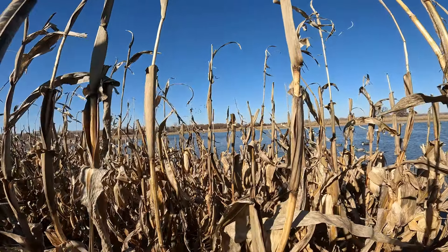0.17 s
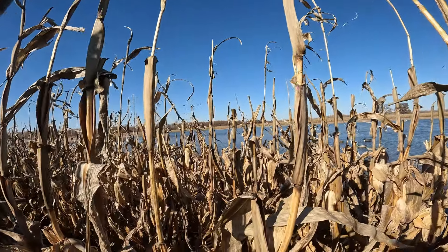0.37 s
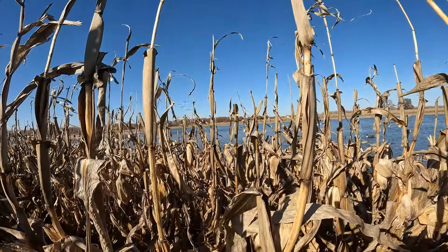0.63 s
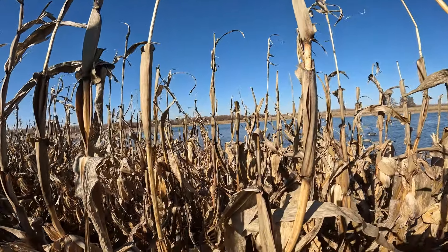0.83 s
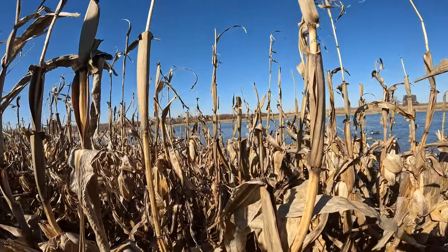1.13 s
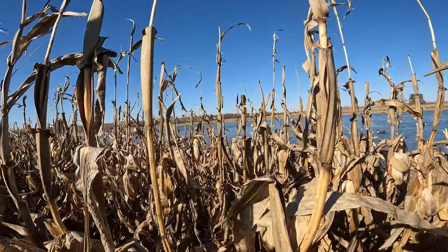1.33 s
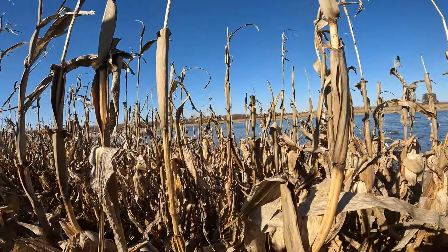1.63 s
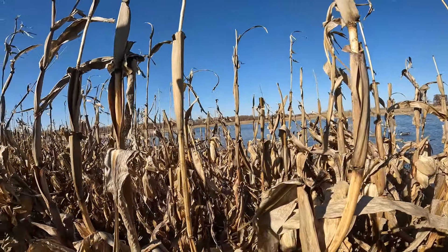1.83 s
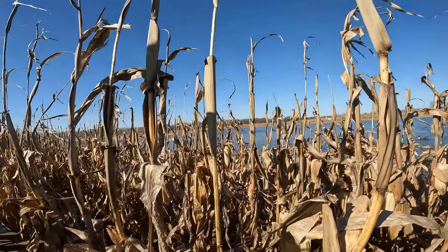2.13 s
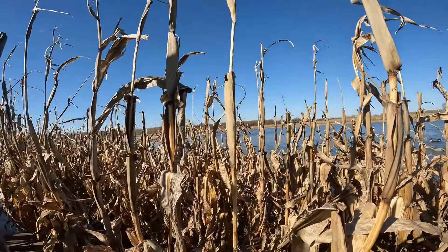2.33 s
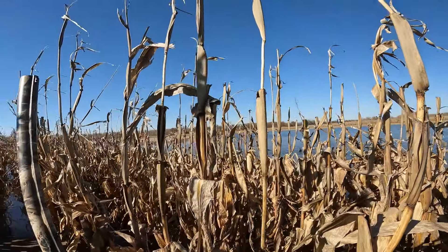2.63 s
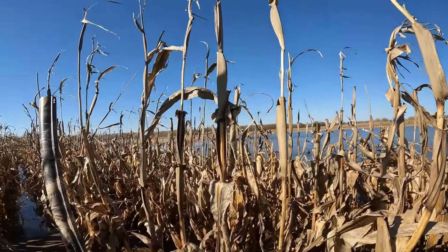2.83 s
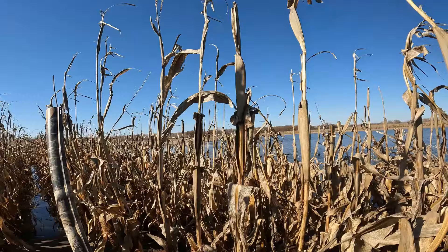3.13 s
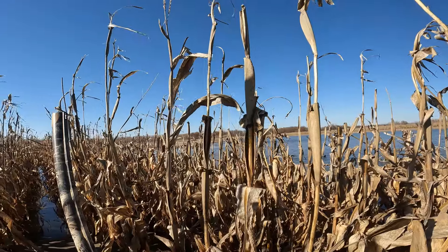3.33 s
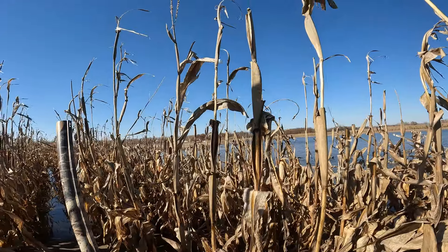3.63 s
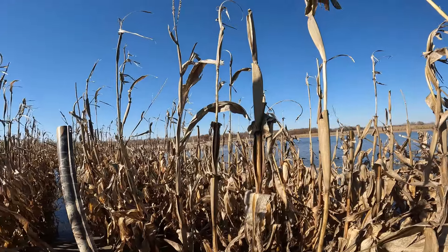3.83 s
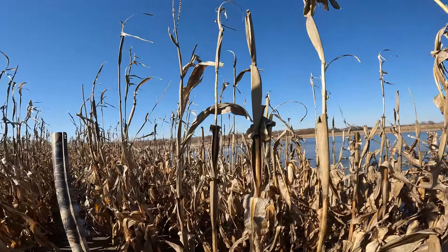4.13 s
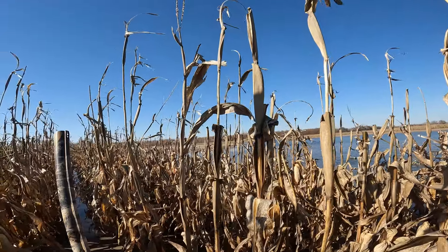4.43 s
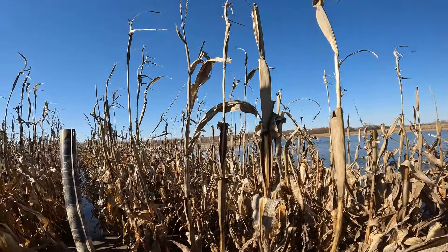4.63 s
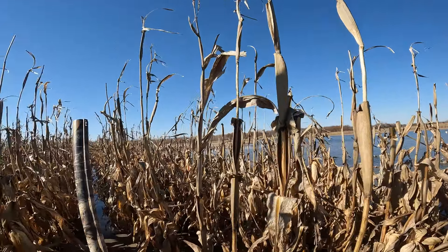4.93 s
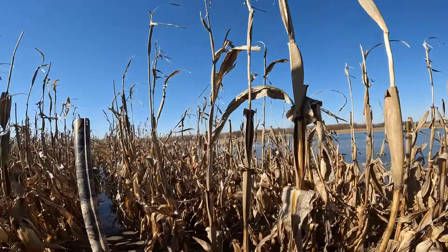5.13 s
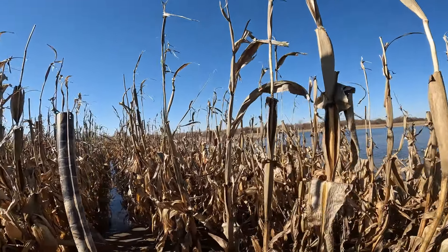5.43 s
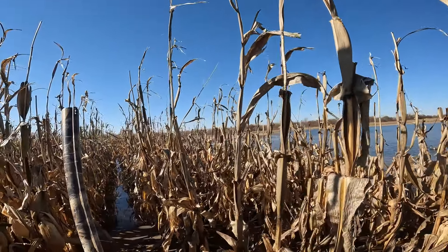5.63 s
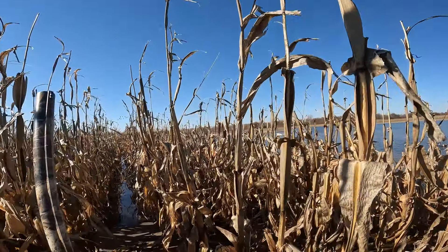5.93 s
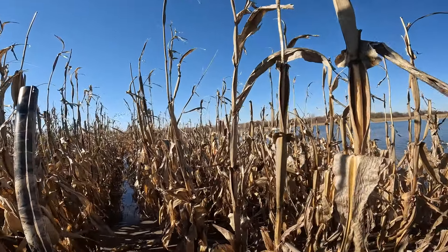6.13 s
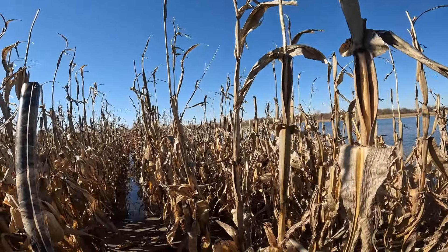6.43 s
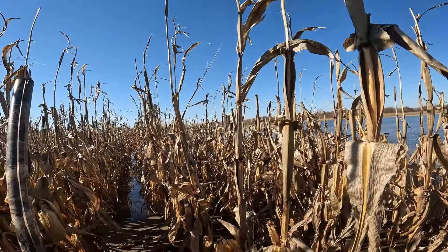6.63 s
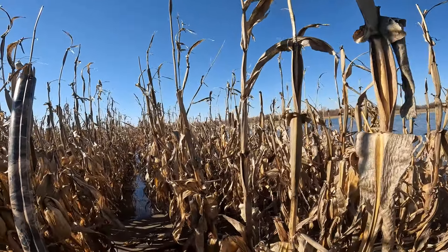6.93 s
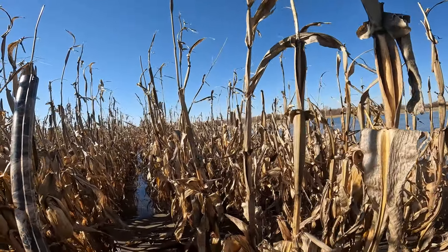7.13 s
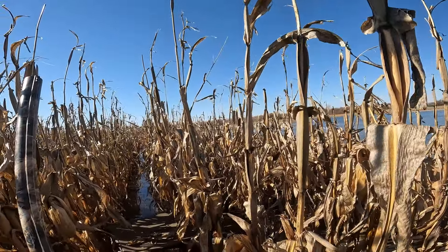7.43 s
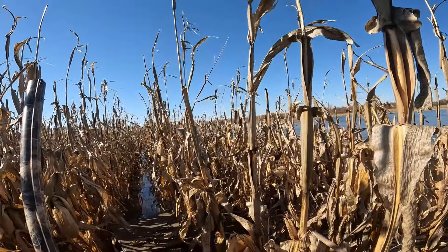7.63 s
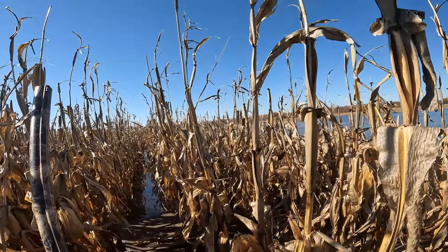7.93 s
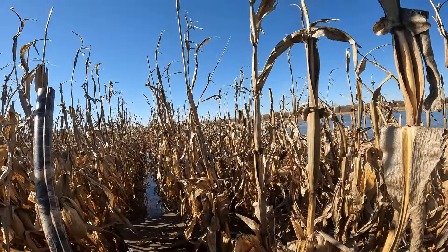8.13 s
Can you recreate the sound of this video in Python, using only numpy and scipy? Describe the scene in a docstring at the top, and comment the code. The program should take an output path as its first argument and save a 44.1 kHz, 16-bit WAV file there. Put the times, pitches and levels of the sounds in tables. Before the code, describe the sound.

A nearby duck call gives a drawn-out reedy note followed by seven fast, rough quacks, most starting with a brief low hum. A second call replies from farther off, its quieter quacks gradually slowing. Wind rumbles and thumps on the microphone while dry corn stalks tick lightly, and the close call sounds the same pattern again. The setting is an open flooded field with a soft background hiss.

```python
"""Low wind on the microphone ports, background hiss and ticking dry stalks, in a flooded corn field.
A near duck call blows a long note and a run of raspy quacks; a far call answers; the near one repeats.
Each call is a reed slapping into a resonant barrel, with air rushing past. A low sliding hum starts
most near quacks. Gusts buffet the ports; the open field returns a short dull echo."""
import sys
import numpy as np
from scipy import signal
from scipy.fft import rfft, irfft, next_fast_len
from scipy.io import wavfile
from scipy.ndimage import uniform_filter1d

SR = 44100
rng = np.random.default_rng(int(sys.argv[2]) if len(sys.argv) > 2 else 0)


def master_out(mix):
    """Clip the mix to full scale and print it as 16-bit PCM to the path in sys.argv[1]."""
    frames = np.transpose(np.atleast_2d(mix))
    ceiling = np.clip(frames, -1, 1)
    pcm = np.round(ceiling * 32767).astype(np.int16)
    wavfile.write(sys.argv[1], SR, pcm)


N = 364953

# wind rumble on the ports: (time [s], level [dB])
WIND_LEVEL = [(0, -39.5), (.25, -48.5), (.6, -46), (1.1, -50.5), (1.4, -56.5), (1.8, -49), (2.0, -60.5),
              (3.5, -54.5), (3.9, -50), (4.5, -46), (5.0, -38), (5.7, -32.5), (6.15, -56), (6.4, -31.5),
              (6.7, -48.5), (7.1, -32), (7.45, -31), (7.75, -46), (8.28, -46)]
# rumble spectrum: (frequency [Hz], density [dB])
WIND_SPECTRUM = [(12, -34), (26, 3), (40, -4), (60, -6), (110, -11), (200, -23.5), (350, -29.5), (700, -53),
                 (1500, -100)]
# gusts over the rumble: (centre [s], peak [dB], length [s])
WIND_GUSTS = [(0.38, -26.5, 0.21), (0.948, -61.5, 0.19), (1.857, -46, 0.059), (2.734, -53, 0.12),
              (4.23, -37, 0.088), (4.398, -31.5, 0.064), (4.637, -35.5, 0.17), (4.866, -28, 0.31),
              (5.125, -22.5, 0.011), (5.531, -31.5, 0.12), (5.815, -23, 0.052), (5.956, -32.5, 0.37),
              (6.25, -42, 0.053), (7.14, -47, 0.096), (7.51, -27, 0.053), (7.622, -25.5, 0.13),
              (7.925, -43, 0.1), (8.243, -40.5, 0.15)]
# sharp pressure swings: (centre [s], peak [dB], frequency [Hz], 1/e half-width [s])
WIND_BUFFETS = [(4.76, -21, 40, .012), (4.794, -11.5, 110, 0.0032), (4.815, -15.5, 115, .007),
                (4.833, -15, 197, 0.0065), (4.847, -9.5, 228, 0.002), (4.856, -11, 70, 0.0048),
                (4.873, -10.5, 89.5, 0.0068), (4.896, -6, 220, 0.0016), (4.91, -9.5, 122, 0.0045),
                (4.923, -20, 130, 0.011), (4.944, -11, 129, 0.0057), (5.461, -10, 224, 0.0028),
                (5.552, -24.5, 99, 0.0071), (5.619, -26.5, 153, 0.003), (5.676, -22, 139, 0.0028),
                (5.803, -11.5, 128, 0.0032), (7.003, -27, 198.2, 0.0037), (7.194, -32, 90.2, .01),
                (7.613, -24, 150, 0.0053), (7.631, -23.5, 294.7, 0.0048), (7.654, -22, 110, 0.0068),
                (7.666, -22, 170, 0.002), (7.908, -28.5, 129, 0.01), (7.964, -33, 136, 0.005)]
# background hiss: (time [s], level [dB])
HISS_LEVEL = [(0, -49), (.33, -51.5), (.66, -62.5), (1.73, -61), (2.05, -66), (2.3, -61.5), (3.7, -51.5),
              (5.0, -51.5), (5.6, -47.5), (5.9, -50), (6.25, -63), (6.7, -57), (7.43, -61.5), (7.8, -64),
              (7.95, -57.5), (8.06, -60.5), (8.28, -58.5)]
# hiss spectrum: (frequency [Hz], density [dB])
HISS_SPECTRUM = [(100, -48), (300, -6.5), (700, -12.5), (1300, -6), (2400, -12), (5700, -14.5), (7500, -20),
                 (10600, -26), (15500, -35)]
# stalk ticks: (time [s], peak [dB], frequency [Hz], t60 [s])
STALK_TICKS = [(0.049, -43, 2270, 0.075), (0.088, -52, 1980, 0.038), (0.279, -36, 1760, 0.016),
               (0.307, -36, 6900, .02), (2.445, -41, 4280, 0.016), (4.796, -38, 2660, 0.015),
               (5.09, -35, 4100, 0.11), (5.1094, -34, 5400, 0.019), (5.109, -42, 1450, 0.042),
               (5.204, -49, 8000, 0.01), (5.319, -44, 1215, 0.05), (5.349, -41.5, 4570, 0.12),
               (5.405, -31.5, 1270, 0.13), (5.431, -28.5, 1140, 0.047), (5.442, -38, 1030, 0.041),
               (5.509, -37, 1680, 0.039), (5.468, -43, 3720, .015), (5.5077, -33, 4830, .02),
               (5.51, -46, 10000, .015), (5.696, -35, 4020, 0.024), (5.697, -48, 10000, .012),
               (5.76, -38, 5560, .03), (5.772, -48, 10600, 0.011), (5.873, -42, 4360, 0.013),
               (7.879, -43.5, 744, 0.035), (8.025, -46.5, 1160, 0.053), (8.03, -45, 5000, .012)]
# hums as the air starts: (start [s], peak [dB], first pitch [Hz], length [s])
ONSET_HUMS = [(0.352, -10.5, 278.7, .072), (0.762, -22.5, 294.7, 0.075), (0.943, -21, 199, 0.059),
              (1.11, -30.5, 177, 0.062), (1.257, -21, 233, 0.052), (1.424, -25, 220, .073),
              (1.596, -22, 222, .055), (1.757, -20.5, 215, 0.064), (2.118, -39, 168, .035),
              (5.904, -15, 261, .072), (6.369, -21.5, 277.4, 0.062), (6.546, -25.5, 176.3, 0.035),
              (6.702, -26, 210.4, 0.091), (6.862, -26, 214, .054), (7.035, -21.5, 229.6, .07),
              (7.233, -23.5, 237, 0.054), (7.456, -22, 252.6, 0.06)]
# long note opening each near run: (time [s], beat rate [Hz], level [dB], raggedness [0-1], pairing [0-1])
NEAR_LONG_NOTES = [
    [(.377, 255, -15, .25, 0), (.392, 290, -16, .5, 0), (.41, 440, -16, .55, .5), (.428, 525, -16, .15, 0),
     (.462, 597, -14, .08, 0), (.49, 582, -15, .13, 0), (.505, 580, -15, .06, 0), (.55, 572, -15, .07, 0),
     (.578, 537, -16, .12, 0), (.6, 520, -16, .2, 0), (.612, 490, -18, .7, .1), (.622, 480, -28, .6, .1)],
    [(5.931, 255, -14, .3, 0), (5.948, 300, -15.5, .5, 0), (5.968, 420, -16, .4, .3),
     (5.978, 495, -16.5, .14, 1), (6.025, 530, -15.5, .06, 1), (6.05, 526, -15.5, .22, 1),
     (6.07, 520, -16, .08, 1), (6.11, 505, -16.5, .1, 1), (6.15, 493, -17.5, .14, 1),
     (6.185, 520, -17, .15, .9), (6.203, 500, -18, .6, .3), (6.213, 480, -25, .6, 0)],
]
# near barrel and cupped hand, one grip per run: (frequency [Hz], gain [dB])
NEAR_BARREL_GAINS = [
    [(600, -17.5), (760, -22), (900, -9), (1050, -4), (1450, -4.5), (1650, -4), (1850, 4.5), (2100, -2.5),
     (2550, -9), (3050, -26.5), (3500, -27), (4100, -23.5), (4700, -23.5), (5900, -19), (7000, -28.5),
     (10000, -44.5), (15000, -62.5)],
    [(600, -17.5), (760, -23), (900, -12.5), (1050, -6), (1450, -6), (1650, -3.5), (1850, 1.5),
     (2100, -7.5), (2600, -9.5), (3050, -21), (3500, -32.5), (4100, -23.5), (4700, -33), (5900, -23.5),
     (7000, -33.5), (10000, -46.5), (15000, -68.5)],
]
# level of the calls between the ports: (frequency [Hz], left over right [dB])
PORT_BALANCE = [(60, -1.5), (130, 0.0), (290, 0.5), (640, 2.0), (1410, 2.5), (3100, 1.5), (6820, 1.0),
                (15000, 1.5)]
# phase of the calls between the ports: (frequency [Hz], left lead [rad])
PORT_PHASE = [(100, 0), (600, -.05), (1100, -.15), (1900, -.6), (2600, -.5), (3900, -.3), (6000, 0),
              (15000, 0)]
# short near quacks: (start [s], length [s], level [dB], at speed after [s], first rate [Hz],
# slow rate [Hz], full rate [Hz], raggedness at speed [0-1], pairing [0-1])
NEAR_SHORT_QUACKS = [ (0.793, 0.07, -16.5, 0.036, 327.6, 293.2, 543, 0.11, 0.09),
                     (0.931, 0.093, -17, 0.071, 297.6, 288.1, 550, 0.37, 0.27),
                     (1.087, .097, -17, 0.091, 497.7, 346.5, 513, 0.09, 0.18),
                     (1.251, 0.104, -17.5, 0.066, 398.3, 269.3, 514.3, 0.5, 0.28),
                     (1.418, .1, -18, 0.08, 317.9, 282.2, 515.8, .2, 0.11),
                     (1.590, 0.093, -18, 0.072, 305, 267.5, 516.2, 0.26, 0.17),
                     (1.757, .120, -17, 0.069, 290, 267, 474.4, 0.062, 0.086),
                     (6.393, 0.084, -17, 0.032, 327.9, 314, 532, 0.44, 0.14),
                     (6.543, 0.093, -16.5, 0.036, 392.8, 351, 510.3, 0.45, 0.17),
                     (6.702, .079, -17.5, .050, 334, 294.3, 521, 0.68, 0.52),
                     (6.858, 0.1, -17, 0.066, 482.3, 339, 504.2, 0.37, 0.28),
                     (7.047, 0.089, -18, 0.055, 328.7, 308.5, 502, 1, 0.041),
                     (7.240, 0.092, -18, 0.051, 300.6, 283.7, 502.6, 0.76, 0.41),
                     (7.479, 0.084, -17, 0.048, 316.5, 297, 498.8, 0.6, 0.44)]
# soft falling first far note: (time [s], beat rate [Hz], level [dB], raggedness [0-1], pairing [0-1])
FAR_FIRST_NOTE = [(1.883, 600, -32, .3, 0), (1.91, 592, -33, .18, 0), (1.925, 575, -29, .07, 0),
                  (1.95, 540, -25.5, .07, .1), (1.96, 525, -27, .2, .8), (1.977, 520, -30, .35, .8),
                  (1.986, 490, -42, .6, .3)]
# far barrel: (frequency [Hz], gain [dB])
FAR_BARREL_GAIN = [(330, -20), (520, -12), (850, -15), (1000, -8), (1400, -6), (1750, -3.5), (2250, -6),
                   (2550, -4), (2750, -1), (3000, -7), (3400, -17), (4000, -14), (5100, -22.5), (5700, -22),
                   (6200, -21.5), (7300, -38), (11000, -51.5), (11900, -50), (12800, -58.5), (15000, -63)]
# short far quacks: (start [s], length [s], peak [dB], loudest after [s], at speed after [s],
# first rate [Hz], full rate [Hz], final rate sag [share], pairing [0-1])
FAR_SHORT_QUACKS = [ (2.116, 0.076, -23.5, 0.027, .02, 449.2, 533, 0.098, 1),
                    (2.304, 0.065, -22, 0.029, 0.027, 374, 535, 0.043, 0.95),
                    (2.471, 0.072, -21.5, 0.038, 0.036, 325, 520, 0.065, 0.63),
                    (2.64, 0.077, -20, 0.048, 0.039, 316, 530.4, 0.082, 0.8),
                    (2.815, 0.073, -19.5, 0.056, 0.043, 314.5, 500.3, 0.027, 0.47),
                    (2.984, 0.085, -19.5, .05, 0.042, 317.4, 500, 0.071, 0.56),
                    (3.187, 0.069, -19.5, .044, .038, 310.5, 494, .06, 1),
                    (3.372, 0.066, -19.5, 0.044, 0.035, 297, 486, 0.056, 0.83),
                    (3.57, .075, -20, 0.033, .034, 299, 493, 0.052, .1),
                    (3.765, 0.069, -20, .039, 0.033, 302, 479, 0.094, 0.53),
                    (3.973, 0.06, -19.5, 0.033, 0.033, 311.7, 475.4, 0.069, 0.7),
                    (4.187, 0.064, -19.5, .031, 0.032, 330.7, 472.4, 0.11, 0.72),
                    (4.404, 0.06, -19.5, 0.026, 0.031, 299.7, 472.8, 0.098, 0.58)]


def from_db(db):
    """Decibels to gain."""
    return 10 ** (np.asarray(db) / 20)


def rms_one(x):
    """Scale to rms 1."""
    return x / np.sqrt(np.mean(x ** 2) + 1e-20)


def in_time(rows):
    """Curve columns, one value per sample."""
    times_s, *columns = np.transpose(rows)
    return [np.interp(np.arange(N) / SR, times_s, column) for column in columns]


def at_hz(points, hz):
    """Read a spectrum on a log axis."""
    knots_hz, values = np.transpose(points)
    return np.interp(np.log(hz + 1), np.log(knots_hz), values)


def shape(x, response):
    """Filter by a function of Hz."""
    size = 2 * next_fast_len(N // 2 + 1)
    return irfft(rfft(x, size) * response(np.arange(size // 2 + 1) * SR / size), size)[..., :N]


def drift(rate_hz):
    """Slow random signal, rms 1."""
    return rms_one(shape(rng.standard_normal(N), lambda hz: 1 / (1 + (hz / rate_hz) ** 2)))


def resonance(x, hz, width_hz):
    """Two-pole peak, gain 1."""
    r = np.exp(-np.pi * width_hz / SR)
    poles = [1, -2 * r * np.cos(2 * np.pi * hz / SR), r * r]
    return signal.lfilter([(1 - r * r) / 2, 0, (r * r - 1) / 2], poles, x + 1e-18)


def stereo_noise(spectrum, correlation):
    """Coloured noise, partly shared by both ports."""
    mid, side = shape(rng.standard_normal((2, N)), lambda hz: from_db(at_hz(spectrum, hz)))
    return rms_one(np.sqrt(1 + correlation) * mid + np.sqrt(1 - correlation) * side * [[1], [-1]])


def convolve_tail(x, tail):
    """Convolve with a stereo tail of unit mean energy per side."""
    return signal.fftconvolve(np.atleast_2d(x), tail / np.sqrt(np.sum(tail ** 2) / 2), axes=1)[:, :N]


def wind(gust_edge_db=-17.5, buffet_cut_hz=750):
    """Lumpy rumble and single pressure swings, stronger on the right port."""
    t, swings = np.arange(N) / SR, np.zeros(N)
    gusts = sum(from_db(db + gust_edge_db * (2 * (t - centre_s) / length_s) ** 2)
                for centre_s, db, length_s in WIND_GUSTS)
    lumps_db = 4.2 * np.clip(drift(20.6) + .22 * np.array([drift(23), drift(23)]), -2, 1.5)
    envelope = (from_db(in_time(WIND_LEVEL)[0]) + gusts) * from_db(lumps_db)
    for (centre_s, peak_db, hz, width_s), phase in zip(WIND_BUFFETS, rng.random(len(WIND_BUFFETS))):
        span = slice(int((centre_s - .08) * SR), int((centre_s + .08) * SR))
        u = t[span] - centre_s
        cusp = np.exp(-np.abs(u / width_s) ** 1.2)
        swings[span] += from_db(peak_db) * cusp * np.cos(2 * np.pi * (hz * u + phase))
    rumble = envelope * stereo_noise(WIND_SPECTRUM, correlation=.83)
    buffets = shape(swings, lambda hz: 1 / (1 + (hz / buffet_cut_hz) ** 4))
    return (rumble + buffets) * from_db([[-2.7], [2.3]])


def background_hiss():
    """Background hiss that sinks after the loud calls and slowly returns."""
    level_db = in_time(HISS_LEVEL)[0] + 1.2 * drift(24)
    return from_db(level_db) * stereo_noise(HISS_SPECTRUM, correlation=.6)


def stalk_ticks():
    """Each tick is a band of fast-dying noise."""
    out, t = np.zeros(N), np.arange(int(.12 * SR)) / SR
    for start_s, peak_db, hz, t60_s in STALK_TICKS:
        burst = rng.standard_normal(len(t)) * from_db(-60 * t / t60_s)
        for _ in range(2):
            burst = resonance(burst, hz, .57 * hz)
        piece = out[int(start_s * SR):][:len(t)]
        piece += (from_db(peak_db) * burst / np.abs(burst).max())[:len(piece)]
    return out


def chirp(centre_s=.059, length_s=.036, hz=7500, peak_db=-48):
    """A faint thin tone swells and fades."""
    t = np.arange(N) / SR - centre_s
    return from_db(peak_db - 14 * (2 * t / length_s) ** 2) * np.sin(2 * np.pi * hz * t)


def onset_hums(end_hz=134):
    """As the air starts, a hum swells, slides down and fades."""
    out = np.zeros(N)
    for start_s, peak_db, first_hz, length_s in ONSET_HUMS:
        progress = np.linspace(0, 1, int(length_s * SR))
        wave = np.sin(2 * np.pi * np.cumsum(first_hz + (end_hz - first_hz) * progress) / SR)
        swell = np.sin(np.pi * progress ** .8) ** 1.1
        out[int(start_s * SR):][:len(wave)] += from_db(peak_db) * swell * wave
    return out


def barrel_ring(x, barrel):
    """Minimum-phase barrel filter: a slap starts sharp and rings on."""
    def response(hz):
        cepstrum = irfft(np.log(from_db(at_hz(barrel, hz))))
        cepstrum[1:len(hz) - 1] *= 2
        cepstrum[len(hz):] = 0
        return np.exp(rfft(cepstrum))
    return shape(x, response)


def air_leak(hum, gain_db=-16):
    """Air leaks through the near barrel with the hum."""
    air = rms_one(barrel_ring(rng.standard_normal(N), NEAR_BARREL_GAINS[0]))
    return from_db(gain_db) * np.abs(hum) * air


def reed_curves(quacks, fade_s):
    """Rate, level, raggedness and pairing per sample; each quack gets a faint lead-in and a fade."""
    rows = []
    for quack in sorted(quacks, key=lambda q: q[0][0]):
        start_s, first_hz, _, *first_texture = quack[0]
        end_s, last_hz, _, *last_texture = quack[-1]
        rows += [[start_s - s, first_hz, db, *first_texture] for s, db in [(.045, -75), (.004, -48)]]
        rows += quack
        rows += [[end_s + n * fade_s, last_hz, db, *last_texture] for n, db in [(1, -80), (2, -90)]]
    rate_hz, level_db, ragged, paired = in_time(rows)
    return rate_hz, level_db, np.clip(ragged, 0, 1), np.clip(paired, 0, 1)


def reed_turns(rate_hz, quacks):
    """Reed phase in cycles, shifted so that the reed catches with a slap as each quack starts."""
    turns = np.cumsum(rate_hz) / SR
    starts = np.sort([quack[0][0] for quack in quacks]) * SR
    catch = -turns[starts.astype(int)] % 1
    knots = np.ravel([starts - .03 * SR, starts - .005 * SR], "F")
    shifts = np.ravel([np.r_[0, catch[:-1]], catch], "F")
    return turns + np.interp(np.arange(N), knots, shifts)


def reed_slaps(turns, curves, push, stray_s, stumble, uneven_db, pair_s, pair_db, max_hz=800):
    """One slap per beat. Ragged beats stray in time and strength; paired beats halve the pitch."""
    rate_hz, _, ragged, paired = curves
    beats = np.interp(np.arange(1, int(turns[-1])), turns, np.arange(N))
    index = beats.astype(int)
    time_noise, level_noise = rng.standard_normal((int(max_hz * N / SR), 2))[:len(beats)].T
    loose = (ragged[index] + .02) * np.maximum(500 / rate_hz[index], 1) ** stumble  # slow reeds stray more
    alternation = paired[index] * (-1.) ** np.arange(len(beats))
    at = np.clip(beats + SR * (stray_s * loose * time_noise + pair_s * alternation), 0, N - 2)
    strength = from_db(uneven_db * loose * np.minimum(level_noise, .4) + pair_db * alternation)
    strength *= np.clip(1 + push[index], .05, 2)
    slaps, fraction = np.zeros(N), at % 1
    np.add.at(slaps, at.astype(int), strength * (1 - fraction))
    np.add.at(slaps, at.astype(int) + 1, strength * fraction)
    return slaps


def reed_rasp(slaps, curves, barrel, air_db, evenness, bite):
    """Slaps and air past the open reed ring the barrel; evenness levels the rasp through each quack."""
    rate_hz, level_db, ragged, _ = curves
    opening = signal.lfilter([1], [1, -.96], slaps + 1e-18)
    puffs = opening * rng.standard_normal(N) * from_db(air_db) * (.17 + ragged)
    drive = (slaps + puffs) / np.sqrt(rate_hz)
    power = barrel_ring(drive, barrel) ** 2
    levelling = (np.mean(power) / uniform_filter1d(power, size=500)) ** (evenness / 2)
    drive *= levelling / np.sqrt(np.mean(power))
    edge = bite * from_db(level_db - level_db.max()) * np.diff(drive, prepend=0)  # hard slaps are sharper
    return barrel_ring((drive + edge) * from_db(level_db), barrel)


def reed_tone(turns, curves, gain_db, subharmonic, slow_db_per_octave, decay_db_per_s):
    """The reed's swing: a soft tone, wider when slow, outlasting the slaps; pairing adds a sub-octave."""
    rate_hz, level_db, ragged, paired = curves
    tone = np.sin(2 * np.pi * turns) + subharmonic * paired * np.sin(np.pi * turns)
    wobble_db = (1 + 5 * ragged) * drift(60) - 9 * ragged
    decay_db = decay_db_per_s * np.arange(N) / SR
    held_db = np.maximum.accumulate(level_db + decay_db) - decay_db
    return tone * from_db(held_db + gain_db + slow_db_per_octave * np.log2(500 / rate_hz) + wobble_db)


def near_quack(start_s, length_s, level_db, at_speed_s, first_hz, slow_hz, full_hz, ragged, paired,
               sag_s=.015, speed_up_s=.035, attack_s=.004, release_s=.005, creep_per_s=1.3):
    """Curve rows: the reed starts ragged, sags, speeds up, creeps higher and is cut off."""
    t = np.linspace(0, length_s, num=40)
    speed = np.clip(1 + (t - at_speed_s) / speed_up_s, 0, 1)
    onset = np.clip(1 - t / attack_s, 0, 1)
    release = np.clip(1 + (t - length_s) / release_s, 0, 1)
    db = level_db - (1 - speed) - 1.5 * onset - 9 * release
    idle_hz = slow_hz + (first_hz - slow_hz) * np.exp(-t / sag_s)
    creep = 1 + creep_per_s * np.maximum(t - at_speed_s, 0)
    rate_hz = (idle_hz + (full_hz - idle_hz) * speed) * creep
    rough = .52 + (ragged - .52) * speed ** 2 + (.4 - ragged) * np.clip(release * 2, 0, 1)
    return np.transpose([start_s + t, rate_hz, db, rough, paired * speed]).tolist()


def near_call(hum, split_s=4):
    """Two runs, the hand cupped differently for each. The hum pushes and chokes the air to the reed."""
    quacks = [near_quack(*row) for row in NEAR_SHORT_QUACKS] + NEAR_LONG_NOTES
    runs = [q for q in quacks if q[0][0] < split_s], [q for q in quacks if q[0][0] > split_s]
    out = np.zeros(N)
    for run, barrel in zip(runs, NEAR_BARREL_GAINS):
        curves = reed_curves(run, fade_s=.006)
        turns = reed_turns(curves[0], run)
        slaps = reed_slaps(turns, curves, push=1.7 * hum, stray_s=.00014, stumble=2.6,
                           uneven_db=1.5, pair_s=.00017, pair_db=2.5)
        out += reed_rasp(slaps, curves, barrel, air_db=-16, evenness=.7, bite=0)
        out += reed_tone(turns, curves, gain_db=-13.5, subharmonic=1.8,
                         slow_db_per_octave=11.5, decay_db_per_s=2996)
    return out


def at_ports(call):
    """Split a call between the ports by level and phase."""
    def left(hz):
        return from_db(at_hz(PORT_BALANCE, hz) / 2) * np.exp(.5j * at_hz(PORT_PHASE, hz))
    return np.array([shape(call, left), shape(call, lambda hz: 1 / left(hz))])


def scatter(call, above_hz, t60_s, direct, spread_db):
    """The treble is smeared over 10 ms, its colour slowly shifting."""
    t = np.arange(int(.01 * SR)) / SR
    treble = shape(call, lambda hz: 1 / (1 + (above_hz / (hz + 1)) ** 8))
    shares = np.array([drift(1.87) for _ in range(4)])
    shares /= np.sqrt(np.sum(shares ** 2, axis=0))
    out = call - treble + direct * treble
    for share in shares:
        paths = rng.standard_normal(len(t)) + .49 * rng.standard_normal((2, len(t)))
        out += from_db(spread_db) * share * convolve_tail(treble, paths * from_db(-60 * t / t60_s))
    return out


def field_echo(call, gain_db, hz, width_hz, t60_s=.11, delay_s=.004):
    """Returns from stalks and water: a dying noise tail, separate per side."""
    t = np.arange(int(.3 * SR)) / SR
    tail = rng.standard_normal((2, len(t))) * from_db(-60 * t / t60_s) * (t > delay_s)
    return from_db(gain_db) * convolve_tail(call, resonance(tail, hz, width_hz))


def far_quack(start_s, length_s, peak_db, loudest_s, at_speed_s, first_hz, full_hz, sag, paired,
              speed_up_s=.024, attack_s=.006):
    """Curve rows of a swell: the reed idles, trips up to speed, then pairs its beats as the rate sags."""
    t = np.linspace(0, length_s, num=40)
    speed = np.sin(np.pi / 2 * np.clip(1 + (t - at_speed_s) / speed_up_s, 0, 1))
    late = np.clip((t - at_speed_s) / (length_s - at_speed_s), 0, 1)
    rate_hz = (first_hz + (full_hz - first_hz) * speed) * (1 - sag * late ** 2)
    onset = np.clip(1 - t / attack_s, 0, 1)
    before_peak = np.clip(1 - t / loudest_s, 0, 1)
    after_peak = np.clip((t - loudest_s) / (length_s - loudest_s), 0, 1)
    db = peak_db - 3 * onset - 15 * before_peak ** 2 - 6 * after_peak ** 2.5
    rough = .07 + .2 * (1 - speed ** 4) + .35 * late ** 3
    trip = .63 * np.sin(np.pi * speed) ** 2
    pairing = .34 * speed ** 4 + .66 * np.sqrt(late) + trip
    return np.transpose([start_s + t, rate_hz, db, rough, paired * pairing]).tolist()


def far_call():
    """The answer: a soft falling note, then swelling quacks on an airier, longer-ringing reed."""
    quacks = [FAR_FIRST_NOTE] + [far_quack(*row) for row in FAR_SHORT_QUACKS]
    curves = reed_curves(quacks, fade_s=.016)
    turns = reed_turns(curves[0], quacks)
    slaps = reed_slaps(turns, curves, push=np.zeros(N), stray_s=.00017, stumble=.5,
                       uneven_db=5.5, pair_s=.0002, pair_db=-1)
    rasp = reed_rasp(slaps, curves, FAR_BARREL_GAIN, air_db=-13, evenness=0, bite=2.2)
    return rasp + reed_tone(turns, curves, gain_db=-10.5, subharmonic=.69,
                            slow_db_per_octave=17, decay_db_per_s=420)


def scene():
    """Both calls at the ports, with echo, hiss, wind, stalk ticks and chirp."""
    hum = onset_hums()
    near, far = near_call(hum), far_call()
    near_stereo = scatter(at_ports(near), above_hz=2900, t60_s=.05, direct=.6, spread_db=-1.5)
    far_stereo = scatter(at_ports(far), above_hz=1200, t60_s=.012, direct=.92, spread_db=-12)
    far_stereo = scatter(far_stereo, above_hz=4600, t60_s=.03, direct=.5, spread_db=-1.5)
    calls = near_stereo + far_stereo + hum + air_leak(hum)
    echo = field_echo(near, gain_db=-20.5, hz=2050, width_hz=3500)
    echo += field_echo(far, gain_db=-12.5, hz=1900, width_hz=5400)
    return calls + echo + background_hiss() + wind() + stalk_ticks() + chirp()


def record(dry):
    """Soft clip, then a steep low-pass."""
    ceiling, stop_hz = .97, 15700
    rounded = dry / (1 + np.abs(dry / ceiling) ** 4) ** .25
    return signal.sosfilt(signal.cheby2(18, 60, stop_hz, fs=SR, output="sos"), rounded)


dry = scene()
out = record(dry)
master_out(out)
```